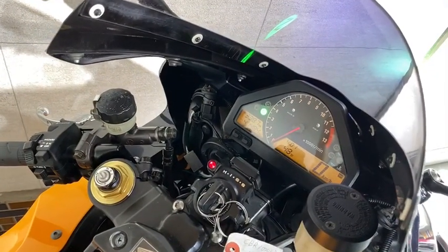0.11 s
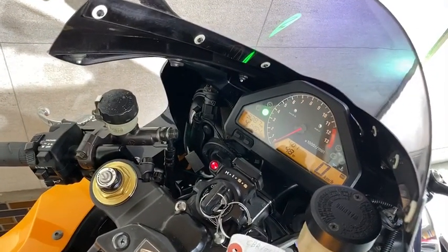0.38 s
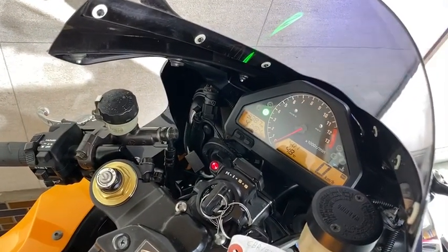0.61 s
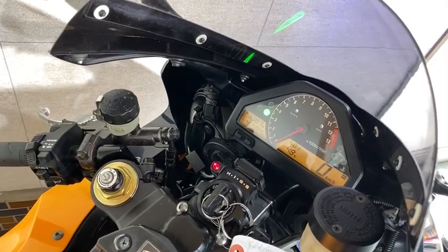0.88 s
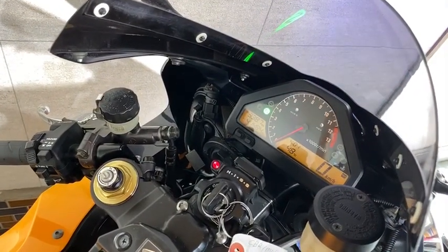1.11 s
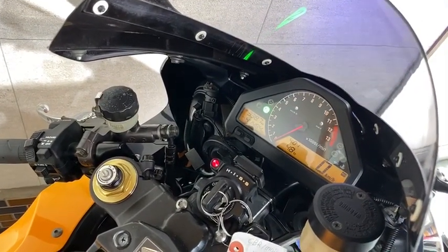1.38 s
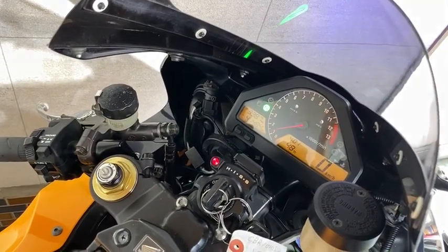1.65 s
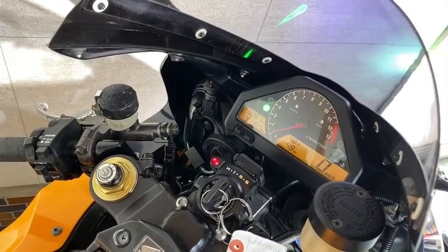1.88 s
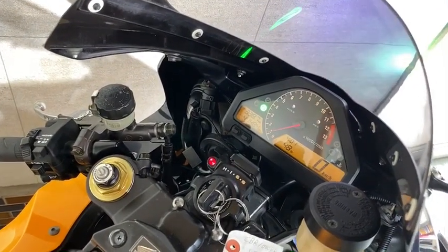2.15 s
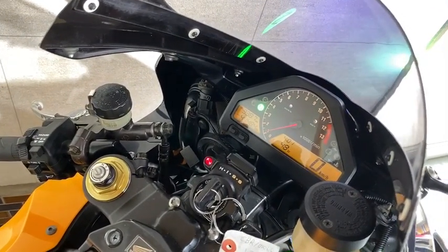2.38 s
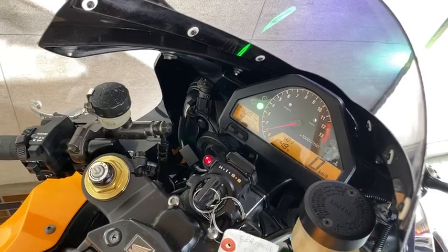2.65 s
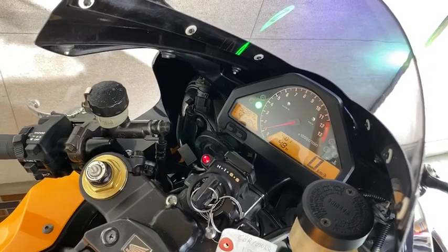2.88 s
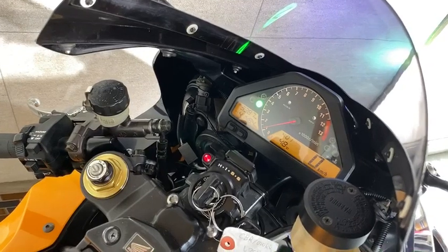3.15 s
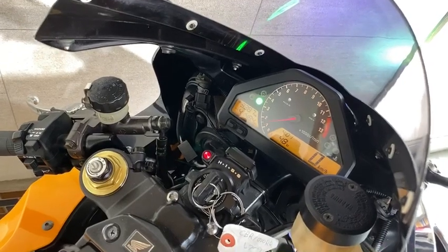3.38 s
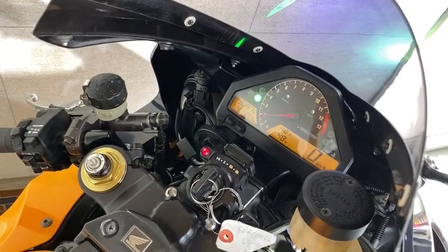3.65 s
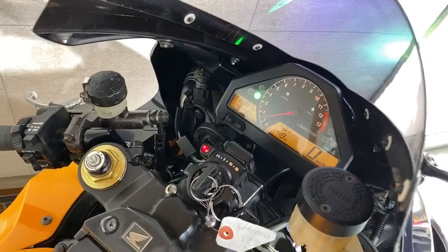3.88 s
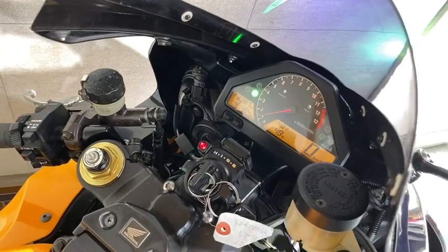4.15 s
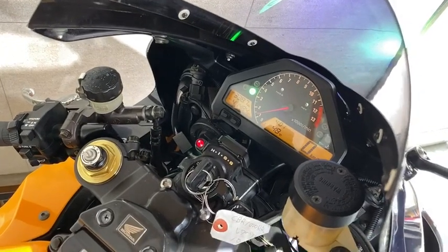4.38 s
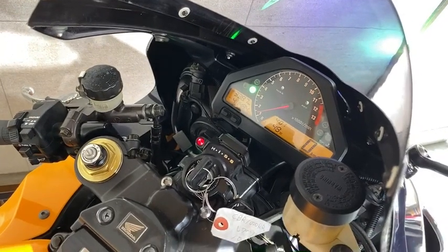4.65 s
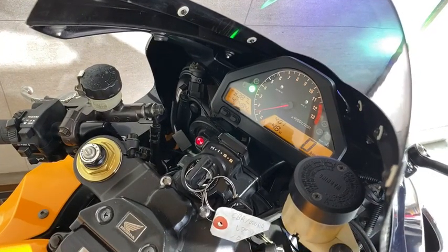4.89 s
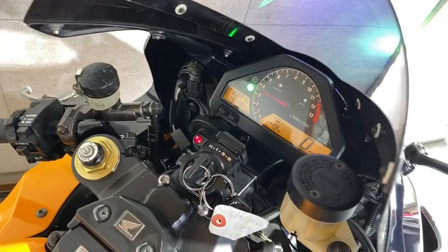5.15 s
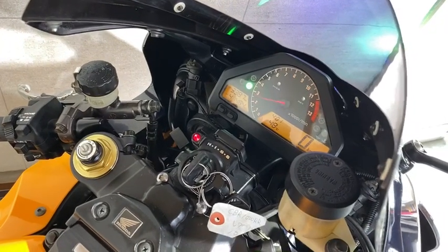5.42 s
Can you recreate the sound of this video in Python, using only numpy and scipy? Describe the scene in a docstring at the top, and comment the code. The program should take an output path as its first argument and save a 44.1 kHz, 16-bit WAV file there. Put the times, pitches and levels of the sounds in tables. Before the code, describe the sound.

A sport motorcycle's starter grinds in uneven strokes, the four-cylinder engine catches, idles with a lope and is revved twice.

```python
"""Workshop rumble and hiss, then a starter labouring over a few compressions: a four-cylinder sport
motorcycle heard from the handlebars. The engine catches, idles with a lope and is blipped twice.
Starter: noise through gear and case spectra, plus gliding and steady tones. Engine: exhaust sines, ringing
thumps, gulped intake noise and valve clatter, all locked to one firing count. Two ports, with a room echo."""
import sys
import numpy as np
from scipy import signal
from scipy.fft import rfft, irfft, next_fast_len
from scipy.io import wavfile
from scipy.ndimage import uniform_filter1d, map_coordinates

SR = 44100
rng = np.random.default_rng(int(sys.argv[2]) if len(sys.argv) > 2 else 0)


def nominal_scale(level):
    """Amplitude ratio for a level in decibels (scalar or array-like)."""
    x = np.asarray(level, float) / 20
    return 10 ** x


def dump_mix(stems):
    """Bounce the given channels to the path in sys.argv[1] as a 16-bit WAV at rate SR."""
    frames = np.atleast_2d(stems).T  # one column per channel
    limited = np.clip(frames, -1, 1)  # hard clip at full scale
    pcm = np.round(limited * 32767).astype(np.int16)
    wavfile.write(sys.argv[1], SR, pcm)


N = 243873
T = np.arange(N) / SR

# workshop rumble and hiss: hz, level_db_per_hz (relative)
SHOP_SPECTRUM = [(15, -44), (25, -47), (33, -11), (55, -3), (129, -13.5), (179, -13), (199, -20),
                 (498, -28.5), (877, -29), (3560, -44.5), (6800, -45), (8220, -53), (13700, -66),
                 (15700, -69)]
SHOP_DB = -36  # rms
# faint electrical tones: pitch_hz, level_db (relative)
WHISTLES = [(5286, -71), (6169, -86), (7047, -77), (13410, -85), (14400, -76), (15396, -82)]

# starter strokes against compression: start_s, level_db, loaded_s, case_ring_db
CRANK_STROKES = [(0.551, -22, 0.068, -16), (0.654, -23, 0.19, -1.5), (0.867, -20, 0.051, -8),
                 (0.989, -21, 0.046, -2), (1.106, -22.5, 0.086, -0.5), (1.237, -21, 0.088, -4.5),
                 (1.365, -29, .09, -3.5)]
# gear rasp: hz, level_db_per_hz (relative)
GEAR_SPECTRUM = [(88, -29), (150, -12), (300, -8), (437, -10.5), (740, -3.5), (1050, -7.5), (1230, -6.5),
                 (2200, -5), (3240, -10), (4790, -12), (7790, -24), (10000, -22), (14500, -47),
                 (15700, -71)]
# starter case resonances: centre_hz, width_hz, level_db
CASE_MODES = [(1687, 28, 2), (1896, 20, 12.5), (2210, 72, 3.5), (2690, 130, 4), (3585, 31, 2.5),
              (4060, 53, 3.5), (4630, 32, -3), (5000, 100, -1)]
# gear take-up: hz, level_db_per_hz (relative)
SNAP_SPECTRUM = [(500, -120), (1500, -12), (5000, -0.5), (7300, -2), (8000, -3), (11000, -8.5),
                 (15700, -20)]
# gliding gear tones of the first six strokes, the first rises, the rest sag:
# start_s, length_s, start_hz, end_hz, level_db (relative)
GEAR_TONES = [(0.576, .065, 1405, 1510, -26), (0.676, .15, 1687, 1170, -24), (.88, .05, 1204, 1163, -23.5),
              (0.998, 0.058, 1458, 1187, -25.5), (1.115, .07, 1778, 1248, -23),
              (1.24, 0.083, 1763, 1162, -23.5)]
# steady starter tones, cover squeals and the held start of the second gear tone:
# start_s, length_s, pitch_hz, level_db (relative)
STEADY_TONES = [(.554, 0.013, 5130, -27), (.56, .085, 2220, -27), (.652, 0.051, 1682, -20),
                (.692, 0.033, 2222, -20), (.725, .05, 2690, -31), (.752, 0.047, 2210, -27),
                (.995, 0.029, 1684, -26), (.997, 0.038, 2180, -27), (1.03, 0.036, 1890, -26),
                (1.12, 0.043, 2250, -28), (1.243, 0.08, 2235, -26), (1.43, 0.25, 2195, -37),
                (1.496, 0.2, 4360, -43)]
GLIDE_SHARE, HALF_PITCH_DB = 0.68, -13.5  # share of the tone spent gliding; line an octave down

# engine before hunting and misfires: time_s, firing_hz, exhaust_level_db (relative)
ENGINE = [(1.34, 30.05, 1), (1.385, 37.5, 2), (1.43, 45.6, 5.5), (1.46, 48.3, -2.5), (1.49, 48, 0),
          (1.55, 38.8, -3), (1.61, 33.05, -1), (1.7, 35.5, -1.5), (1.86, 34, -3), (1.99, 37.1, -1),
          (2.6, 37.49, -0.5), (3.21, 37.9, 0.5), (3.26, 40.36, 1), (3.29, 47.2, 3), (3.36, 71.38, 5.5),
          (3.4, 84.3, -11), (3.45, 79.05, 0), (3.61, 49.2, 1.5), (3.68, 43, -0.5), (3.74, 42.38, -2),
          (4.1, 41.1, -1), (4.74, 40.57, 0), (4.92, 40.3, -4), (4.96, 57.26, 6.5), (5.0, 79.36, 4.5),
          (5.06, 111.7, -1.5), (5.11, 128.1, -2.5), (5.24, 100.9, -0.5), (5.34, 76.4, -2.5),
          (5.46, 58, 2.5), (5.53, 53.17, -1)]
CATCH_S = 1.352
# exhaust balance over speed: firing_hz, order1_db, order2_db, order3_db, order4_db (relative)
ORDERS = [(34, -28, -18.5, -24, -26.5), (37.4, -24.5, -19.5, -30, -25), (43, -24.5, -17.5, -36, -33),
          (58, -22, -27, -35, -35), (75, -18.5, -24.5, -54, -34), (125.3, -21, -64, -26, -39)]
# one entry per exhaust order: phase_turns in the firing pulse
ORDER_PHASE_TURNS = [0, .04, .04, .06]
# one entry per exhaust order: random_drift_db
ORDER_WANDER_DB = [1.8, .6, 2.5, .8]
# exhaust thump resonances above the low orders: centre_hz, width_hz, level_db
PIPE_MODES = [(213.2, 25, -2), (294, 29, -5.5)]
# uneven burning: hz, level_db_per_hz (relative)
SHAKE_SPECTRUM = [(20, -40), (35, -21), (60, -1.5), (110, 7.5), (170, -5.5), (300, -46.5)]
# single weak firings: time_s, dip_db
MISFIRES = [(2.115, -8), (2.81, -6), (3.02, -7), (3.235, -6), (3.67, -6), (3.87, -6), (3.895, -6)]
MISFIRE_S = 0.014  # Gaussian width
# idle hunting: start_s, length_s, climb_hz, swell_db
SURGES = [(3.729, 0.098, 2.5, 3.5), (3.92, 0.16, 8, 2.5), (4.14, 0.13, 6.4, 2), (4.339, 0.13, 10.7, 2),
          (4.55, 0.1316, 7.8, 2.5), (4.746, 0.17, 4.8, 4)]
STUMBLE_DB = -4  # between surges
SURGE_CLATTER, SURGE_DRONE = 0.17, 0.17  # dB for each dB of surge

# throttle openings, the first as the engine catches: start_s, held_s, opening_0_to_1
BLIPS = [(1.36, 0.016, .18), (3.258, 0.018, 0.94), (4.913, 0.066, 1)]
SNAP_OPEN = .45  # rise exponent; under 1 the level leaps at first touch of the throttle
IDLE_DRONE_DB, IDLE_RASP_DB, IDLE_CLATTER_DB = -28, -33, -32.5
RASP_HZ = 680  # the air box drones below, the throttle bodies rasp above
RASP_DB_PER_OCTAVE = 1.5  # of firing rate
CLATTER_HOLDS = 0.11  # share of the held opening that the valve train stays loud
COAST_S, COAST_LAG_S = 0.15, 0.26  # Gaussian width; delay after the held opening
COAST_DB, COAST_ORDERS_DB = -5, -10  # valve train hushes; without burning, upper orders fade
# air box and fairing resonances: centre_hz, width_hz, level_db
AIRBOX_MODES = [(474, 30, -3.5), (790, 56, 0.5), (1250, 298, -9), (1740, 6.5, -6.5), (2199, 39, -13)]
# intake noise with the throttle shut: hz, level_db_per_hz (relative)
ROAR_SPECTRUM = [(100, -12), (170, 0), (185, -4), (272, -2), (329, -9), (472, -10), (693, -10.5),
                 (800, -17), (3000, -22), (3900, -23.5), (6600, -120)]
# intake noise with the throttle open: hz, level_db_per_hz (relative)
BARK_SPECTRUM = [(120, -30), (200, -0.5), (352, -2), (501, -0.5), (736, -3), (815, 3), (1120, -4),
                 (1240, -7.5), (1520, -17), (3000, -87), (3900, -63), (6600, -120)]
# valve train: hz, level_db_per_hz (relative)
CLATTER_SPECTRUM = [(820, 0), (1400, -14.5), (1650, -2), (1990, -4.5), (2210, -5.5), (4810, -10),
                    (5430, -12), (6320, -12), (7890, -20.5), (14300, -28.5), (15700, -42)]
TICK_S, TICK_LENGTH_S, TICK_DB = 1.65, .012, 7  # brief treble tick: peak time, rise time, rise
PUMP_HZ, PUMP_DB = 1700, -45  # thin whine while the engine runs; mean pitch, mean peak level

# room decay: hz, t60_s
WALLS = [(200, 0.81), (2000, 0.75), (10000, 0.022)]
# port correlation of noise: hz, likeness_0_to_1
ALIKE = [(100, 0.96), (250, 0.79), (500, 0.68), (800, 0.21), (6500, 0.29), (8000, 0.75), (11000, 0.77)]
# port balance: hz, left_minus_right_db
LEFT_OVER_RIGHT = [(60, 1.5), (180, 1.5), (550, 2.0), (1650, 1.5), (4970, 0.0), (15000, -1.5)]
# port phase: hz, right_lead_rad
RIGHT_LEAD = [(0, 0), (500, -.3), (1500, -1.7), (2200, -.1), (3300, 1.3), (3900, 5.4), (5000, 6.9),
              (6500, 12.3), (7800, 15.2), (8500, 15.1), (11200, 4 * np.pi)]
MONO_HZ = 11400


def unit(x):
    """Scaled to rms 1."""
    return x / np.sqrt(np.mean(x ** 2) + 1e-20)


def along(points, hz):
    """(Hz, value) points read on a log axis."""
    f, v = np.transpose(points)
    return np.interp(np.log(hz + 1), np.log(f + 1), v)


def curves(rows):
    """One value per sample for each column after the time."""
    s, *cols = np.transpose(rows)
    return [np.interp(T, s, c) for c in cols]


def wobble(rate_hz):
    """A smooth random curve, rate_hz knots a second."""
    return map_coordinates(rng.standard_normal(int(N * rate_hz / SR) + 4), [T * rate_hz])


def filtered(x, response):
    """x times a complex response of frequency."""
    m = next_fast_len(N + SR // 2)
    return irfft(rfft(x, m) * response(np.fft.rfftfreq(m, 1 / SR)), m)[..., :N]


def modes(table):
    """Causal response of a few resonances, alternating in sign."""
    return lambda f: sum((-1) ** k * nominal_scale(db) * 1j * f * w / (c * c - f * f + 1j * f * w)
                         for k, (c, w, db) in enumerate(table))


def pair():
    """White noise at two ports, partly alike."""
    def shares(hz):
        turn = np.arccos(np.clip(along(ALIKE, hz), -1, 1)) / 2
        return np.array([np.cos(turn), np.sin(turn)])

    mid, side = filtered(rng.standard_normal((2, N)), shares)
    return np.array([mid + side, mid - side])


def coloured(x, spectrum):
    """x through a (Hz, dB) spectrum, at rms 1."""
    return unit(filtered(x, lambda hz: nominal_scale(along(spectrum, hz))))


def shop_air():
    """Low rumble of the building, a thin hiss and faint electrical whistles."""
    tones = sum(nominal_scale(db + 5.5 + 2.5 * wobble(9)) * np.sin(2 * np.pi * hz * T) for hz, db in WHISTLES)
    return nominal_scale(SHOP_DB + 0.28 * wobble(5.84)) * coloured(pair(), SHOP_SPECTRUM) + tones


def starter():
    """Each compression loads the gears: a snap as they take up, then a rasp that rings the case."""
    load, ring, snap = np.zeros((3, N))
    for s, db, loaded_s, ring_db in CRANK_STROKES:
        t = np.clip(T - s, 0, None)
        stroke = (1 - np.exp(-t / 0.0048)) * nominal_scale(-110 * np.clip(t - loaded_s, 0, None) - 34.5 * t)
        stroke *= 1 - 0.062 * np.clip((t - loaded_s) / 0.0036, 0, 1)
        load = np.where(t > 0, np.maximum(nominal_scale(db) * stroke, load * np.exp(-t / .004)), load)
        arch = np.sin(np.pi * np.clip(t / loaded_s, 0, 1)) ** 0.29
        ring = np.where(t > 0, nominal_scale(db + ring_db) * arch, ring)
        snap += nominal_scale(db - 5.5 - 60 * t / .09) * (1 - np.exp(-t / 0.0006))
    teeth = pair() * nominal_scale(0.51 * wobble(220))
    rasp = load * coloured(teeth, GEAR_SPECTRUM)
    case = ring * unit(filtered(teeth, modes(CASE_MODES)))
    return rasp + case + snap * coloured(pair(), SNAP_SPECTRUM) + whines()


def whines():
    """Short, slightly unsteady tones; the gliding gear tones carry a weaker line at half pitch."""
    out, waver, flutter_db = np.zeros(N), 1 + .009 * wobble(120), 3 * wobble(110)
    tones = [(*row, nominal_scale(HALF_PITCH_DB)) for row in GEAR_TONES]
    tones += [(s, length_s, hz, hz, db, 0) for s, length_s, hz, db in STEADY_TONES]
    for s, length_s, start_hz, end_hz, db, half in tones:
        span = slice(round(s * SR), round((s + length_s) * SR))
        u = np.clip((T[span] - s) / length_s, 0, 1)
        glide = np.sin(np.pi / 2 * np.clip(u / GLIDE_SHARE, 0, 1)) ** 2
        pitch_hz = (start_hz + (end_hz - start_hz) * glide) * waver[span]
        angle = 2 * np.pi * np.cumsum(pitch_hz) / SR
        swell = nominal_scale(db + 2 + flutter_db[span]) * np.abs(np.sin(np.pi * u)) ** .4
        out[span] += swell * (np.sin(angle) + half * np.sin(angle / 2))
    return out


def walls(x):
    """Each frequency of the room's answer dies at its own speed."""
    hz, t, z = signal.stft(rng.standard_normal((2, SR // 2)), SR, nperseg=256)
    decay = nominal_scale(-60 * t / along(WALLS, hz)[:, None]) * (hz[:, None] > 300)
    tail = signal.istft(z * decay, SR, nperseg=256)[1]
    late = np.pad(x, ((0, 0), (500, 0)))  # samples of delay
    return signal.fftconvolve(late, tail / np.linalg.norm(tail[0]), axes=1)[:, :N]


def engine():
    """Exhaust, intake and valve train follow one firing count; shake and pump run freely beside it."""
    firing_hz, surge_db, order_db = exhaust_controls()
    drone_db, rasp_db, clatter_db = intake_controls(firing_hz, surge_db)
    running = np.clip((T - CATCH_S) / 0.013, 0, 1)
    fired = np.cumsum(firing_hz) / SR
    count = fired.astype(int)
    luck = rng.standard_normal((count[-1] + 2, 3))  # per firing: burn, blow, gulp
    # the four cylinders burn unevenly
    burn_db = 1.2 * luck[:, 0] + np.resize([2, -1.7, 1, -1.3], len(luck))
    burn = uniform_filter1d(nominal_scale(burn_db)[count], size=300)
    blows = np.diff(count, prepend=0) * nominal_scale(2.7 * luck[count, 1])
    thump = nominal_scale(order_db[3] - 6.5) * unit(filtered(blows, lambda f: modes(PIPE_MODES)(f) ** 2))
    rough = rng.standard_normal(N) + 0.35 * rng.standard_normal((2, N))
    shake = nominal_scale(order_db[1] - 7.5) * coloured(rough, SHAKE_SPECTRUM)
    air = intake(fired, blows, luck[count, 2], drone_db, rasp_db)
    burning = burn * (exhaust(fired, order_db) + thump)
    return running * (pump() + burning + shake + air + clatter(fired, clatter_db))


def exhaust(fired, order_db):
    """Four sines at multiples of the firing rate."""
    return sum(nominal_scale(db + 5 + 0.18 * wobble(7.5)) * np.sin(2 * np.pi * ((k + 1) * (fired - .4) + turn))
               for k, (db, turn) in enumerate(zip(order_db, ORDER_PHASE_TURNS)))


def intake(fired, blows, gulp_luck, drone_db, rasp_db):
    """Each intake stroke gulps turbulent air; open throttle plates make the ringing air box bark."""
    puff = np.exp(-((fired % 1 - .45) / 0.49) ** 2)
    gulp = unit(4.2 + nominal_scale(3.6 * gulp_luck) * puff) * pair()
    boxed = unit(filtered(gulp, modes(AIRBOX_MODES)))
    pulses = unit(filtered(blows, modes(AIRBOX_MODES)))
    bark = coloured(gulp, BARK_SPECTRUM) + 0.69 * boxed + 0.29 * pulses
    shut = coloured(gulp, ROAR_SPECTRUM) + 0.83 * boxed
    throttle = np.clip((drone_db - IDLE_DRONE_DB) / 8, 0, 1)
    roar = np.sqrt(1 - throttle) * unit(shut) + np.sqrt(throttle) * unit(bark)
    drone = filtered(roar, lambda hz: 1 / (1 + (hz / RASP_HZ) ** 8))
    return nominal_scale(drone_db) * unit(drone) + nominal_scale(rasp_db) * unit(roar - drone)


def clatter(fired, level_db):
    """Valve train: noise pulsing four times per firing."""
    beat = np.exp(-(fired * 4 % 1) / 2.2) * nominal_scale(3.04 * wobble(140))
    ticks = unit(1 + .5 * beat) * pair()
    return nominal_scale(level_db + 0.69 * wobble(12)) * coloured(ticks, CLATTER_SPECTRUM)


def pump():
    """A sine whine, slightly unsteady in pitch and level."""
    turns = np.cumsum(PUMP_HZ * (1 + 0.00278 * wobble(25))) / SR
    return nominal_scale(PUMP_DB + 4.6 * wobble(13)) * np.sin(2 * np.pi * turns)


def exhaust_controls():
    """Firing rate, surge swell and the level of each order."""
    firing_hz, level_db = curves(ENGINE)
    s, length_s, climb_hz, swell_db = np.transpose(SURGES)
    first, last = s[0], s[-1] + length_s[-1]
    hunting = hump(first - .04, 0.0423, last - first, 0.032)
    edges_s = np.ravel([s, s + length_s], order='F')
    edges_hz = np.ravel([-climb_hz, climb_hz], order='F') / 2
    firing_hz = firing_hz + hunting * np.interp(T, edges_s, edges_hz)
    surge_db = hunting * STUMBLE_DB
    for start, length, db in zip(s, length_s, swell_db):
        arch = np.sin(np.pi * np.clip((T - start) / (length + .045), 0, 1)) ** .9
        surge_db = surge_db + (db - STUMBLE_DB) * arch
    level_db = level_db + sum(db * np.exp(-((T - at) / MISFIRE_S) ** 2) for at, db in MISFIRES)
    speed_hz, *share_db = np.transpose(ORDERS)
    first_db, *upper_db = [np.interp(firing_hz, speed_hz, db) + level_db + surge_db + wander * wobble(14)
                           for db, wander in zip(share_db, ORDER_WANDER_DB)]
    return firing_hz, surge_db, [first_db, *(upper_db + COAST_ORDERS_DB * coasting())]


def intake_controls(firing_hz, surge_db):
    """Drone, rasp and clatter levels follow the throttle."""
    drone_db = IDLE_DRONE_DB + opening_db(lag_s=0, attack_s=.055, release_s=.11, rise_db=16)
    drone_db = drone_db + SURGE_DRONE * surge_db + 1.35 * wobble(25)
    rasp_db = IDLE_RASP_DB + opening_db(lag_s=.015, attack_s=.05, release_s=.15, rise_db=14)
    rasp_db = rasp_db + RASP_DB_PER_OCTAVE * np.log2(firing_hz / 38) + 1.95 * wobble(25)
    clatter_db = IDLE_CLATTER_DB + opening_db(0, .065, .11, 14.5, CLATTER_HOLDS)
    clatter_db = clatter_db + COAST_DB * coasting() + SURGE_CLATTER * surge_db + 0.53 * wobble(25)
    tick = hump(TICK_S - TICK_LENGTH_S, TICK_LENGTH_S, 0, 3 * TICK_LENGTH_S)
    return drone_db, rasp_db, clatter_db + TICK_DB * tick


def opening_db(lag_s, attack_s, release_s, rise_db, holds=1):
    """Level rise from the throttle openings; rise_db answers a full one."""
    return sum(rise_db * size * hump(s + lag_s, attack_s, holds * held_s, release_s, SNAP_OPEN)
               for s, held_s, size in BLIPS)


def hump(s, attack_s, hold_s, release_s, snap=1):
    """0-1 envelope; snap under 1 makes the rise leap."""
    shape = np.interp(T, np.cumsum([s, attack_s, hold_s, release_s]), [0, 1, 1, 0])
    return np.where(T < s + attack_s, shape ** snap, shape)


def coasting():
    """Bell curves after each blip, scaled by its opening: throttle shut, the engine runs down."""
    return sum(size * np.exp(-((T - s - held_s - COAST_LAG_S) / COAST_S) ** 2) for s, held_s, size in BLIPS)


def scene():
    """The machine, its echo and the room tone, at two ports that differ in level and phase."""
    bike = engine() + starter()
    air = bike + nominal_scale(-15) * walls(bike) + shop_air()
    sides = np.array([[.5], [-.5]])

    def ports(hz):
        lead_rad = np.interp(hz, *np.transpose(RIGHT_LEAD))
        return nominal_scale(sides * along(LEFT_OVER_RIGHT, hz)) * np.exp(-1j * sides * lead_rad)

    return filtered(air, ports)


def roll_off(x):
    """The treble ends steeply here."""
    return signal.sosfilt(signal.butter(12, 15840, fs=SR, output="sos"), x)


def record(dry):
    """Mono above MONO_HZ; peaks round off smoothly below full scale."""
    mid, side = (dry[0] + dry[1]) / 2, (dry[0] - dry[1]) / 2
    side = filtered(side, lambda hz: hz < MONO_HZ)
    x = np.array([mid + side, mid - side])
    mix = x / (1 + np.abs(x) ** 8) ** (1 / 8)
    return roll_off(mix)


dry = scene()
out = record(dry)
dump_mix(out)
```